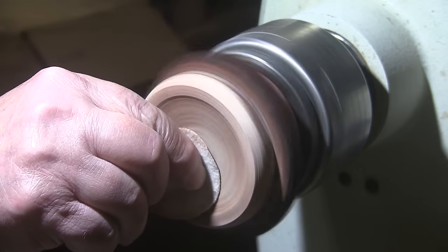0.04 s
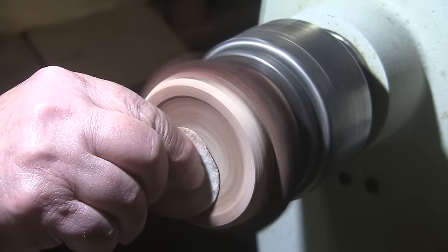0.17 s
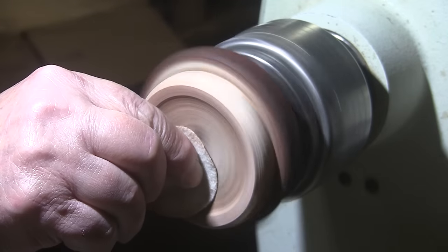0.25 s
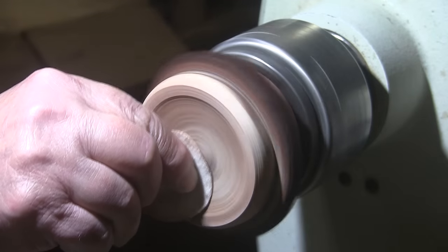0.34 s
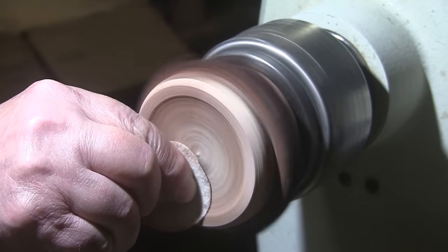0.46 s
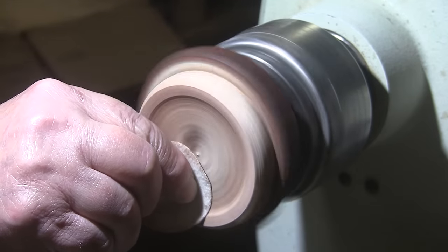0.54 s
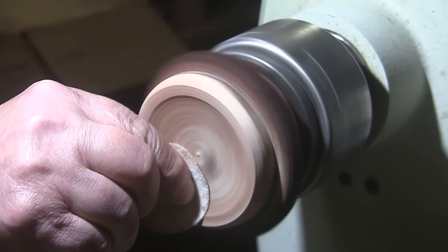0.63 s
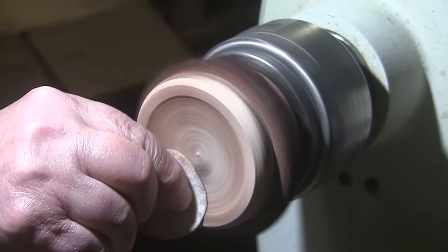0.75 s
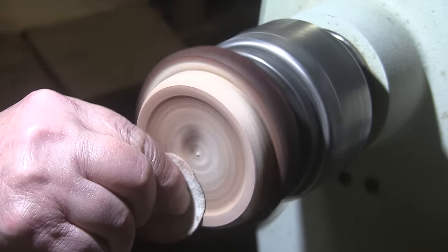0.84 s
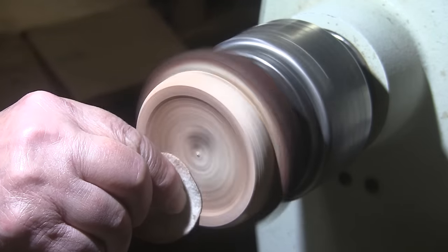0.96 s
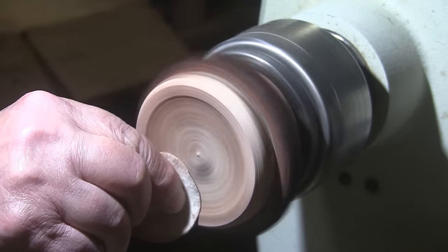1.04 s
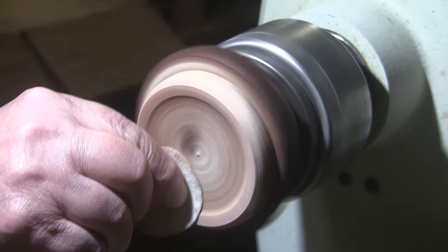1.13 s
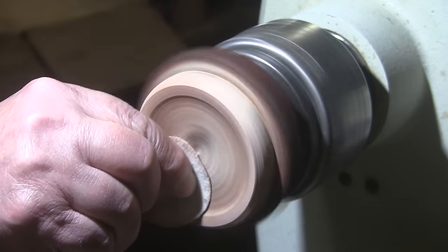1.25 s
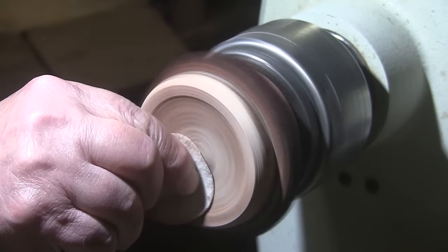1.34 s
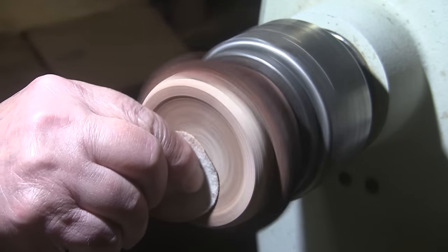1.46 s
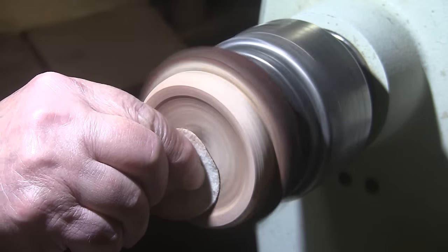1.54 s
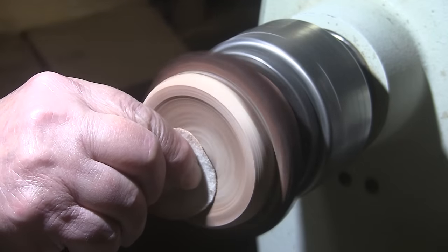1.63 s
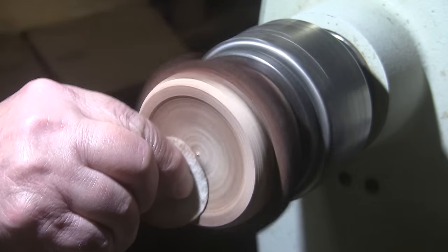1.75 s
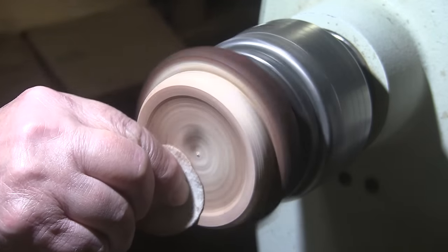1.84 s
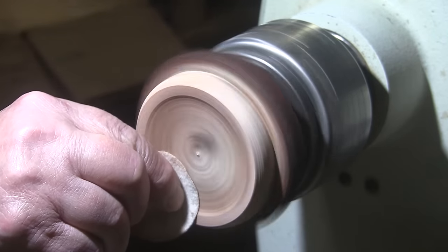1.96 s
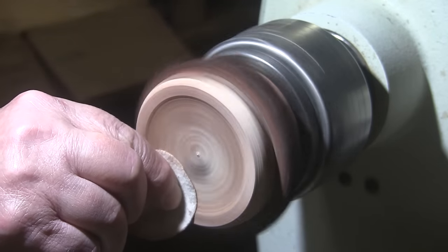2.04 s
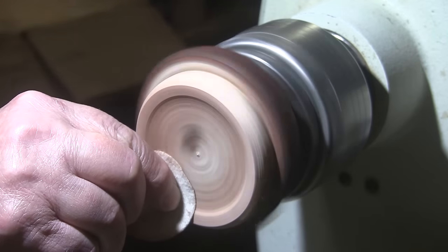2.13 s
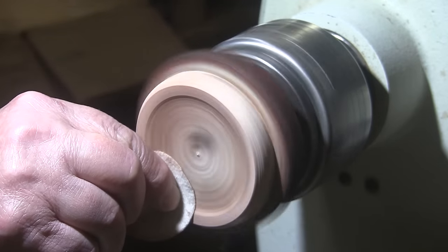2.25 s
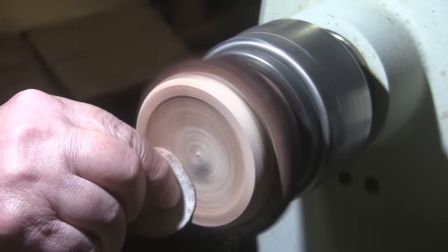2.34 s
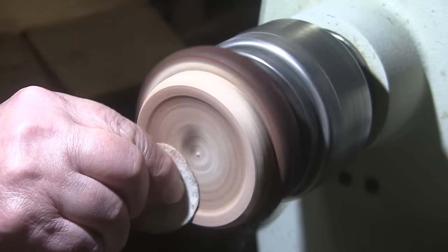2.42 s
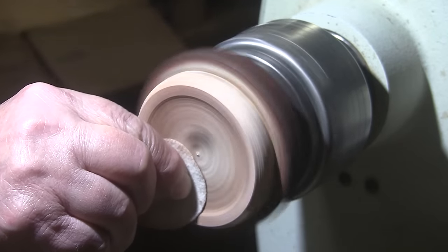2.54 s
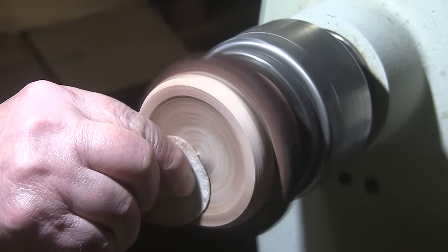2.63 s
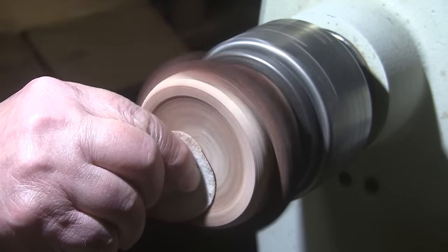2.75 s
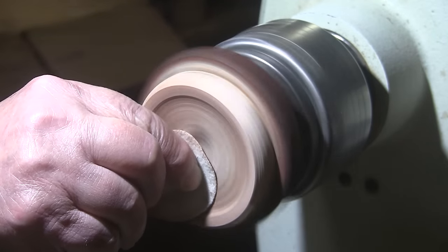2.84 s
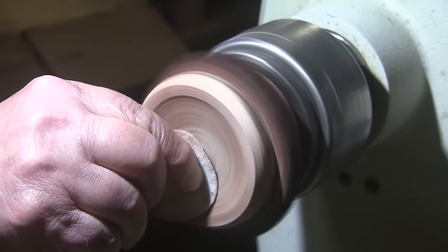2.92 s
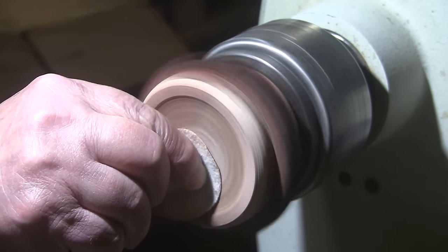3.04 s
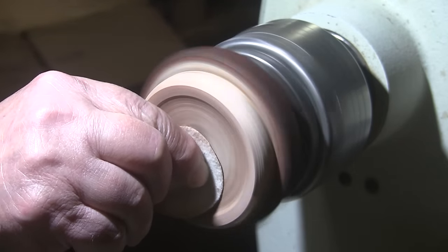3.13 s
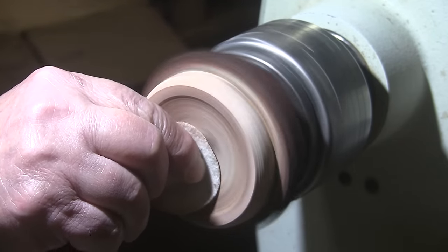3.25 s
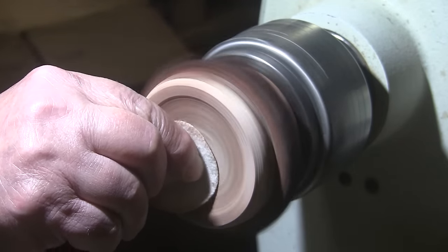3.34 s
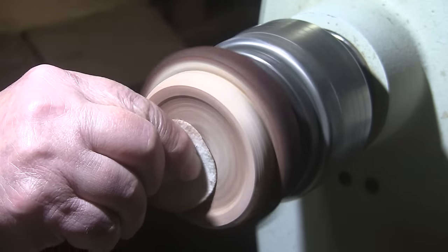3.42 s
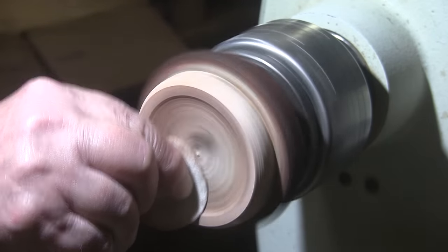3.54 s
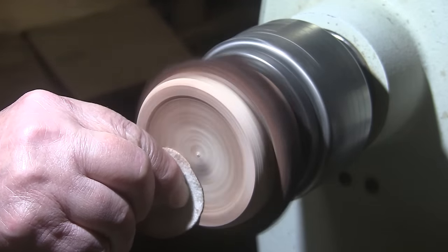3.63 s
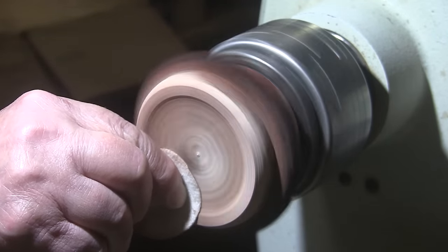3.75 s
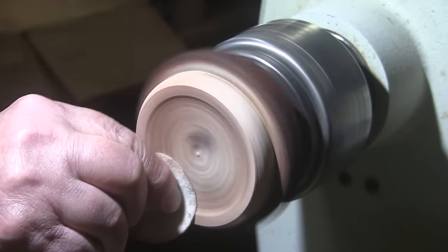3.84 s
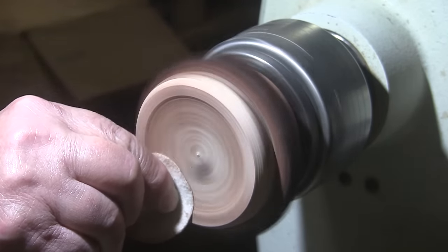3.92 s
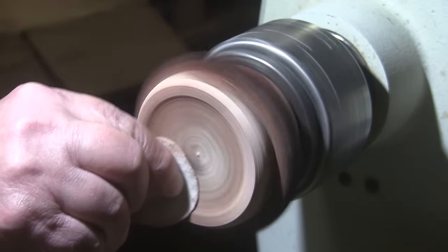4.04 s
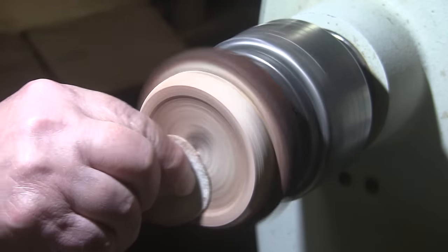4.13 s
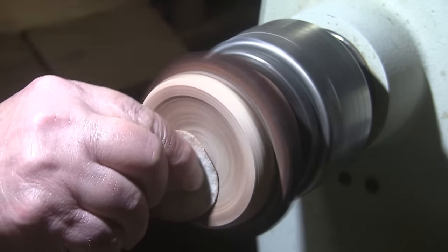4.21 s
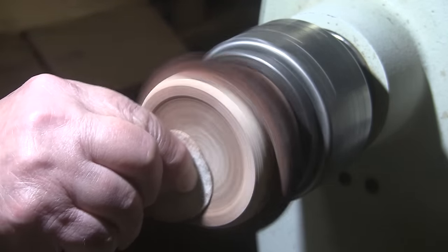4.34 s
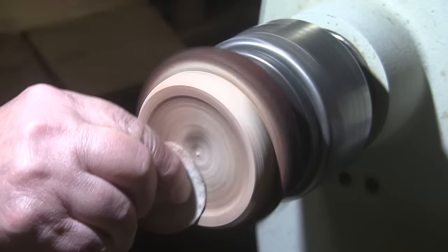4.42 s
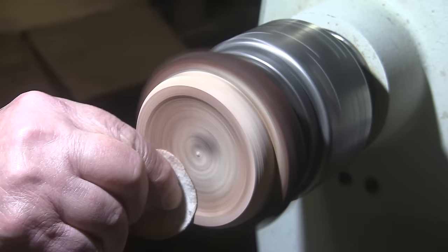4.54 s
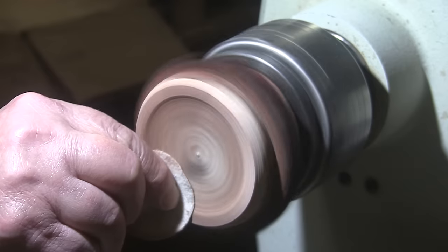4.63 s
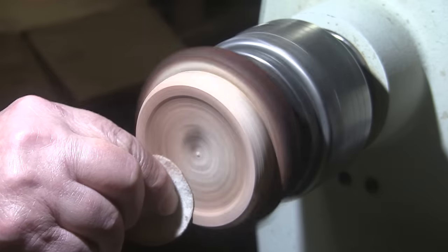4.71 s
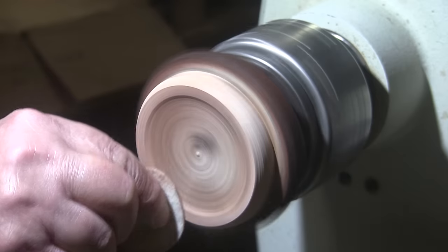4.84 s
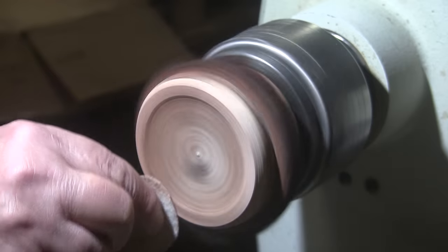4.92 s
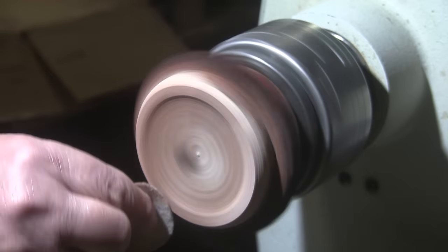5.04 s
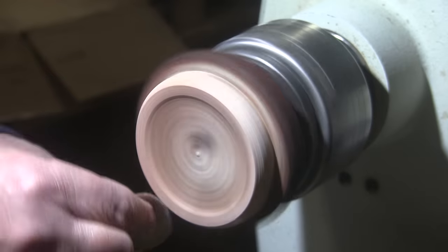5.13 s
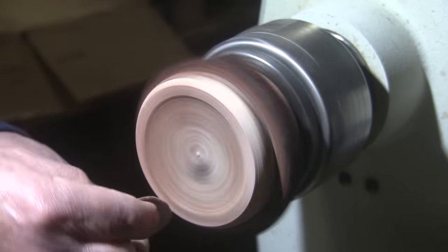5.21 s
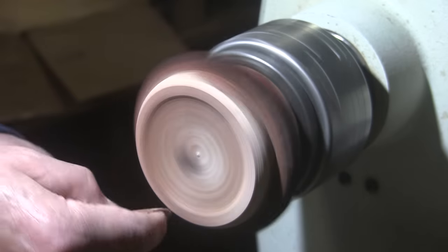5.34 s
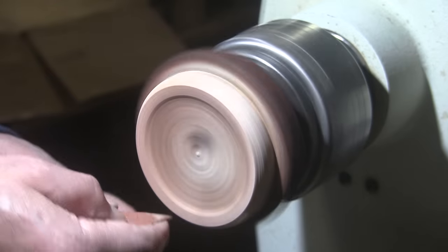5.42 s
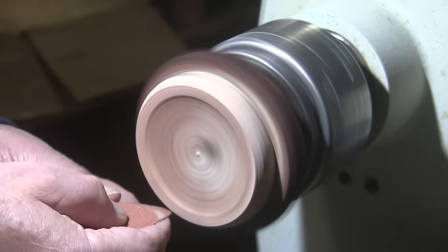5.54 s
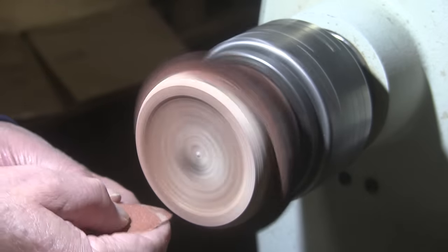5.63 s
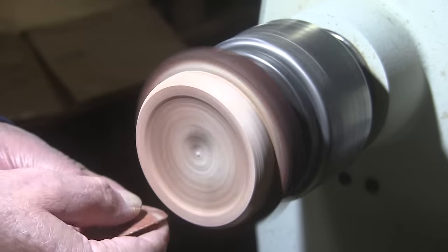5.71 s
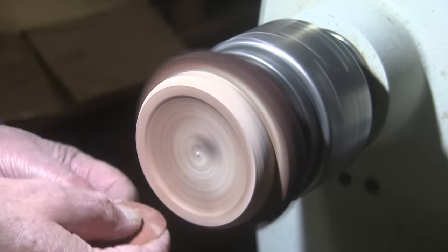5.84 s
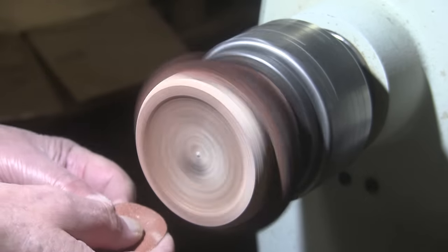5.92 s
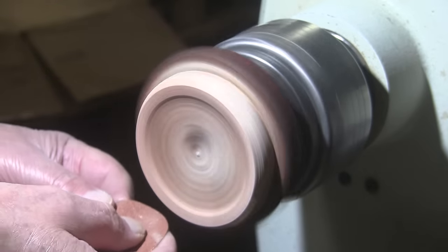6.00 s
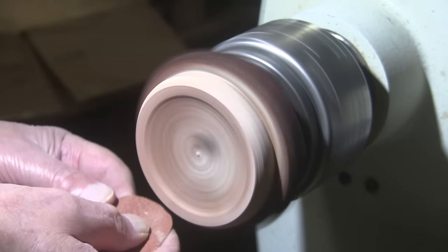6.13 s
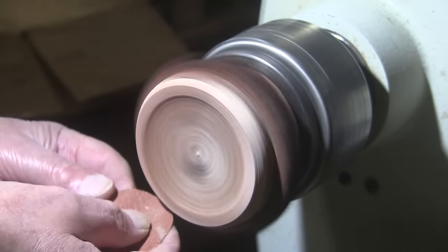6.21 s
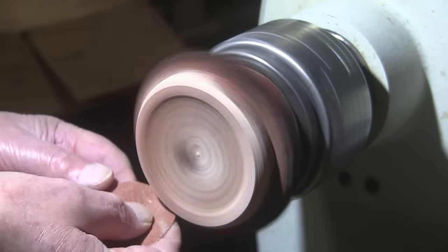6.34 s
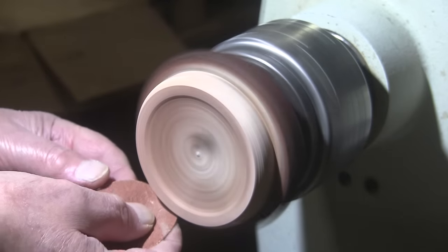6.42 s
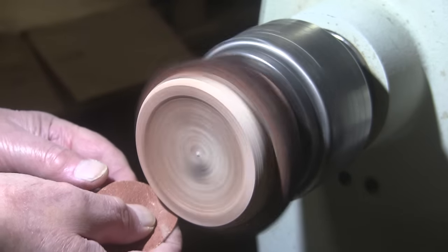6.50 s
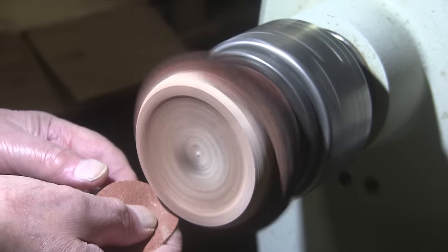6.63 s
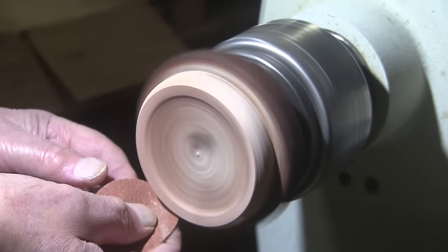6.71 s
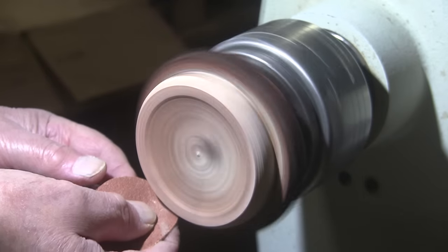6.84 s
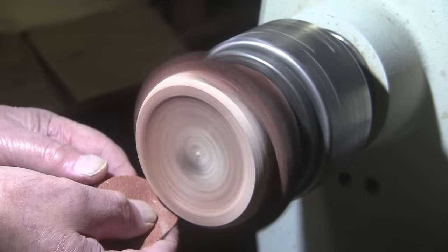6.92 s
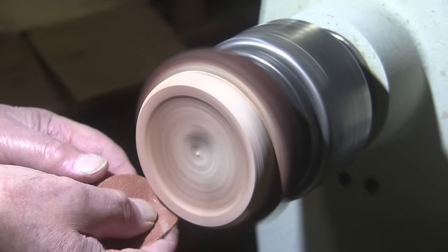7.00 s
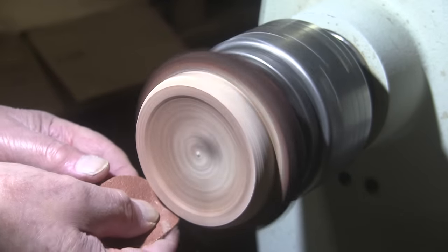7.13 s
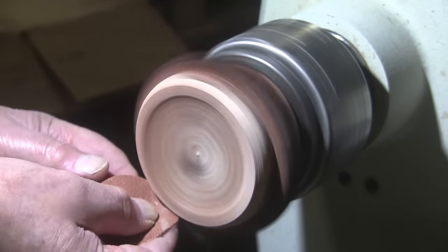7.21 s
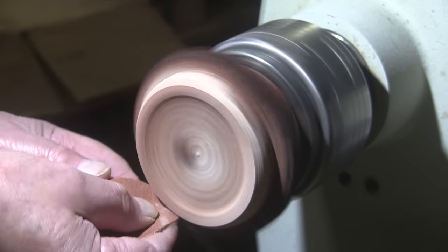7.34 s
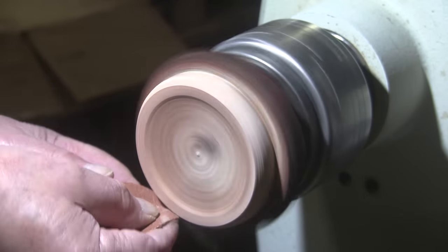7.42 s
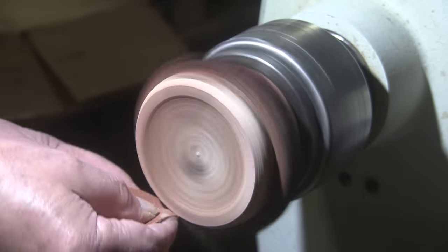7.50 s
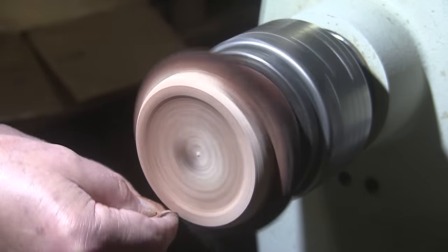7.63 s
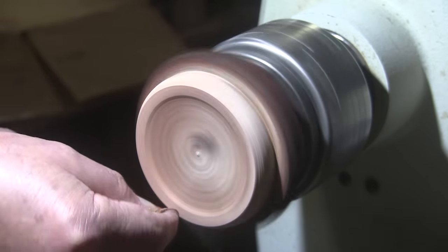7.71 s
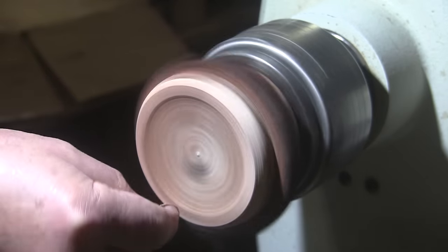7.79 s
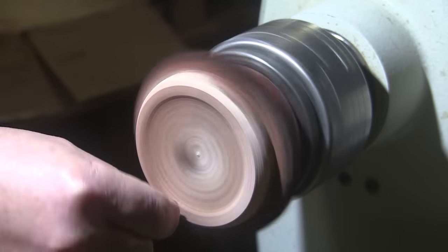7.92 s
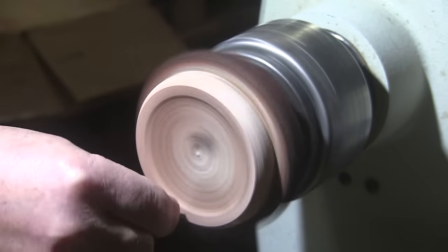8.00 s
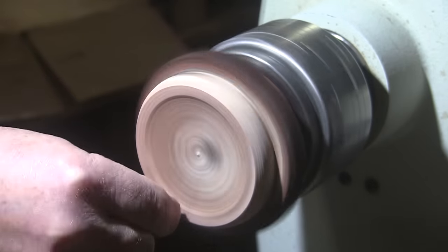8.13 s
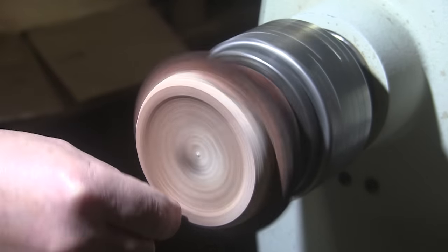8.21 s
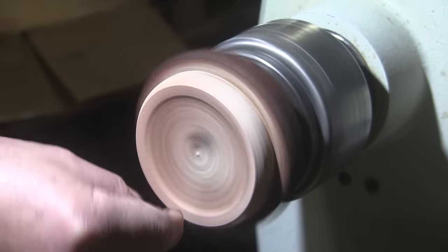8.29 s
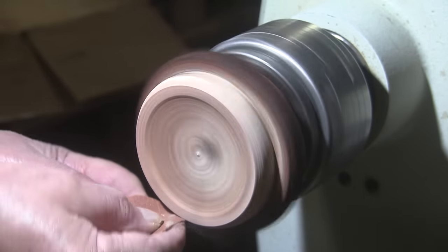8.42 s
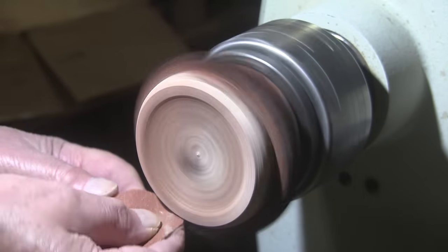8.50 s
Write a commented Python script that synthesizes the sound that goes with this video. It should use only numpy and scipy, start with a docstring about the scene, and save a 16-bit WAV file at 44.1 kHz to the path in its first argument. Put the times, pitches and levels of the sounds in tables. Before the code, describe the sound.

Loud gritty sandpaper hiss sweeps out and back four times on a spinning wooden bowl, lifts off to bare lathe drone, then rasps on the rim.

```python
"""At a workshop lathe, a hand holds an abrasive disc against a small spinning wooden bowl.
The disc sweeps out and back across the face four times, then lifts away and later rides on the rim.
Grit scratches (noise and clicks) ring the wood; further out is louder, and rough grain returns every turn.
Stray fibres snag the disc as short bursts. Underneath, noise makes the frame drone and the drive tick,
wavering sines make the motor hum, and a cluster of steady tones makes the speed controller whine."""
import sys
import numpy as np
from scipy import signal
from scipy.fft import irfft
from scipy.io import wavfile
from scipy.ndimage import uniform_filter1d

SR = 44100
rng = np.random.default_rng(int(sys.argv[2]) if len(sys.argv) > 2 else 0)


def put_to_file(sound):
    """Save the sound as 16-bit audio at rate SR, in the file named by the first command-line argument."""
    columns = np.atleast_2d(sound).T  # one column per channel
    safe = np.clip(columns, -1, 1)
    whole_steps = np.round(safe * 32767)
    wavfile.write(sys.argv[1], SR, whole_steps.astype(np.int16))


N = 377562
TIME = np.arange(N) / SR  # seconds

# turning rates of the bowl and the drive, and the motor supply frequency
SPINDLE_HZ, DRIVE_HZ, SUPPLY_HZ = 6.93, 23.95, 41.4
# top of the band that is kept
EDGE_HZ = 15850
# level of the frame's drone
FRAME_DB = -37
# pitch of the motor hum, and its level before the left-right balance
HUM_HZ, HUM_DB = 75.7, -52.5
# the hand nearly lets go once
SLACK_S, SLACK_LENGTH_S, SLACK_DB = 3.44, 0.14, -9.5
# the hand lifts the disc off the face: the drop after one length, growing with the square of time
LIFT_S, LIFT_LENGTH_S, LIFT_DB = 4.954, 0.11, -22.5

# broad colours of the lathe frame and of a drive tick: [pitch_hz, relative_level_db]
FRAME_COLOUR = [(22, -19), (48, -6.5), (100, 1.5), (150, 0.5), (300, -4), (900, -7.5), (1600, -3.5),
                (3000, -11.5), (8000, -16.5), (12500, -21), (15700, -9.5)]
TICK_COLOUR = [(500, -13), (1500, 2.5), (3500, 2.5), (7000, -2), (11000, -5), (15000, -9.5)]
# broad colours of the two places where the disc rubs: [pitch_hz, relative_level_db]
FACE_COLOUR = [(60, -48), (300, -31.5), (1100, -16.5), (1800, -12), (3000, -9), (5000, -1.5), (8000, 0),
               (10000, -1.45), (13000, -2.5), (15600, -10)]
RIM_COLOUR = [(60, -42), (300, -22), (1100, -13), (1800, -14.5), (3000, -9.5), (5000, 1.8), (8000, 1.5),
              (10000, 2), (13000, -0.5), (15600, -6)]
# broad colours of a catch, its snap and its dragging scrape: [pitch_hz, relative_level_db]
SNAP_COLOUR = [(80, -42), (400, -15), (1100, -12), (2050, 1.5), (2600, -2.5), (3400, 2.5), (5500, -5),
               (15000, -22)]
DRAG_COLOUR = [(400, -29), (1100, -17), (1650, -7), (2050, 1), (2400, -5), (3300, -6), (6000, -13),
               (15000, -26)]
# resonances of the frame and of the wood rubbed at the face and rim: [pitch_hz, width_hz, lift_db]
FRAME_MODES = [(222, 4, 8), (242, 15, 8.5), (376.4, 77, 14.3), (415, 14, 6.4), (515.6, 49, 11.5),
               (662, 46, 10.9), (787, 110, 9.9), (879, 49, 10.5), (974, 63, 10.5), (1123, 19, 10.4),
               (1320, 50, 9), (2960, 330, 8.1), (3870, 190, 4)]
FACE_MODES = [(2070, 150, 4.5), (2721, 420, 7.9), (3393, 220, 11.4), (3650, 150, 5.2), (4010, 230, 9.9),
              (4574, 230, 6.1), (5420, 165, 6.6), (6230, 200, 4), (6800, 71, 6.3), (7510, 140, 5.1),
              (11560, 250, 2.5)]
RIM_MODES = [(1970, 260, 8.3), (2780, 520, 8.3), (3296, 330, 10.2), (4000, 610, 6.9), (6440, 320, 4.7),
             (6880, 105, 8.3), (7800, 190, 2.7), (8750, 270, 2.8), (11260, 235, 4)]
# the disc's free edge sings while the wood's lower ring fades: [pitch_hz, width_hz, lift_at_share_1_db]
DISC_MODES = [(3300, 1500, -3.5), (7600, 420, 6), (8870, 390, 5)]
# the bowl's wall rings more when rubbed near the edge: [pitch_hz, width_hz, lift_at_amount_1_db]
WALL_MODES = [(2690, 400, 8.5), (4000, 200, 1.5)]
# moments when the disc's edge sings: [middle_s, length_s, share_of_lift]
SINGS = [(0.965, 0.2, 1.2), (7.697, .35, 0.67), (8.552, 0.24, 1.85)]
# sweeps from the centre of the face to its edge and back:
# [sets_out_s, at_edge_s, turns_back_s, at_centre_s, extra_force_at_edge_db]
SWEEPS = [(0.376, .93, 1.05, 1.277, 7), (1.68, 2.01, 2.19, 2.85, 7.5), (3.413, 3.73, 3.99, 4.09, 7.5),
          (4.355, 4.55, 4.64, 5.56, 8)]
# how firmly the hand presses at the centre of the face: [time_s, force_db]
FIRMNESS = [(0, -21.5), (1.4, -24.5), (2.7, -24.5), (3.3, -27), (4.2, -23.5)]
# where the disc bites deepest and where it hisses brightest: [place (0 centre, 1 edge), width, lift_db]
BITE_ZONE = (0.43, 0.8, 6)
SHARP_ZONE = (0.75, 0.46, 2.85)
# the disc on the rim, before its bounce: [time_s, force_db, low_band_lift_db, treble_lift_db]
RIM_HOLD = [(6.326, -33.5, 2, -5.5), (6.5, -20.5, 4.5, -6), (6.82, -17, -2, -6), (6.88, -21.5, -2.5, 2.5),
            (7.12, -19.5, -0.5, 1), (7.56, -24.5, -1.5, -0.5), (7.9, -29, 3, 4.5), (8.33, -30.5, 3.5, 2),
            (8.5, -20.5, -1, 1)]
# stray fibres catch the disc: [start_s, strength_db], before the snap and drag levels
CATCHES = [(.548, -20), (.697, -5), (.828, -13), (1.122, -12), (1.844, -3.5), (2.41, -3.5), (2.435, -7),
           (2.564, -4), (3.717, -10), (4.417, -11), (4.437, -8.5), (4.491, -5), (4.708, -9), (4.859, -13.5),
           (6.385, -9.5), (6.408, -5), (6.591, -9.5), (6.79, -7)]
# the hardest ticks of the drive: [start_s, level_db]
HARD_TICKS = [(5.269, -41), (5.73, -40), (5.894, -33), (6.314, -33)]
# lulls and swells of the hum: [middle_s, length_s, change_db, pitch_sag_hz]
HUM_CHANGES = [(1.25, 0.69, -16, 0), (2.245, 0.37, -15, 0), (7.05, .6, -7, 0), (7.63, 0.39, 8, 4)]
# the microphone pair, likeness of its two channels: [pitch_hz, likeness (0 to 1)]
LIKENESS = [(60, 0.99), (150, 0.97), (380, 0.94), (950, 0.61), (2380, 0.63), (5980, 0.54), (15000, 0.12)]
# the microphone pair, left against right: [pitch_hz, left_minus_right_db]
BALANCE = [(60, 0), (92, -4), (140, -1.5), (210, -5), (330, -1.5), (500, -4.0), (770, -1.5), (1170, -5),
           (1790, 0), (2740, -1.0), (4190, -1.5), (6410, 0.5), (9810, -7.5), (15000, -7)]
# the microphone pair, how far left leads right: [pitch_hz, lead_radians]
LEAD = [(300, -0.86), (3000, 0.33), (7000, -1), (10000, 0.8), (11500, 2.5), (15000, 2.8)]


def gain_of(db):
    """Turns decibels into amplitude."""
    return np.exp(np.asarray(db) * (np.log(10) / 20))


def evened(x):
    """Scales to rms 1."""
    return x / np.sqrt(np.mean(x ** 2) + 1e-20)


def read(points, hz):
    """Reads a table between its points, along a log-pitch axis."""
    f, value = np.transpose(points)
    return np.interp(np.log(hz + 1), np.log(f + 1), value)


def bell(x, middle, width):
    """A smooth hump of height 1, with its width taken at half height."""
    return np.exp2(-(2 * (x - middle) / width) ** 2)


def wander(rate_hz):
    """Smooth random drift of rms 1, mostly slower than the given rate."""
    hz = np.fft.rfftfreq(2 ** 19, 1 / SR)
    real, imaginary = rng.standard_normal((2, 4096))
    spectrum = (real + 1j * imaginary) * np.exp(-(hz[:4096] / rate_hz) ** 2)
    return evened(irfft(spectrum, 2 ** 19)[:N])


def colour(broad, modes, hz):
    """A broad spectrum with resonances standing on it, in dB."""
    peaks = sum(db / (1 + (2 * (hz - f) / width) ** 2) for f, width, db in modes)
    return read(broad, hz) + peaks


def radiate(drive, broad, modes=(), band=(0, SR), tilt=None, size=1024):
    """Two drives ring a body and reach the microphone pair; unit white drive gives unit level in the band."""
    overlap = size * 3 // 4
    hz, t, (a, b) = signal.stft(drive, SR, nperseg=size, noverlap=overlap)
    body = gain_of(colour(broad, modes, hz))
    in_band = (hz >= band[0]) * (hz <= band[1])
    body /= np.sqrt(np.mean(body ** 2 * in_band))

    # the right channel shares part of the left one's sound, and comes later where left leads
    same = np.clip(read(LIKENESS, hz), 0, .99)[:, None]
    right = same * a + np.sqrt(1 - same ** 2) * b
    right = right * np.exp(-1j * read(LEAD, hz))[:, None]

    side = gain_of(read(BALANCE, hz) / 2)[:, None]
    balance_size = np.sqrt((side ** 2 + side ** -2) / 2)
    pair = np.array([a * side, right / side]) * body[:, None] / balance_size
    if tilt:
        pair = pair * gain_of(tilt(hz, t))
    return signal.istft(pair, SR, nperseg=size, noverlap=overlap)[1][:, :N]


def grit(per_s, spread_db, share):
    """Countless tiny scratches merge into a hiss; the larger grains stand out as clicks."""
    sizes = np.minimum(rng.exponential(1, N), 2.8)
    clicks = (rng.random(N) < per_s / SR) * gain_of(spread_db * sizes)
    clicks = evened(clicks * rng.choice([-1, 1], (2, N)))
    hiss = rng.standard_normal((2, N))
    return np.sqrt(1 - share) * hiss + np.sqrt(share) * clicks


def bursts(events, decay_s):
    """Each event jumps to its level and dies away."""
    s, db = np.transpose(events)
    kicks = np.bincount(np.round(s * SR).astype(int), gain_of(db), N)
    return signal.lfilter([1], [1, -np.exp(-1 / (decay_s * SR))], kicks + 1e-12)


def echoes(drive, t60_s=0.062):
    """Lathe bed, hand and bench throw back a short, faint tail."""
    age = np.arange(SR // 5) / SR
    taps = rng.choice([-1., 1.], len(age)) * (rng.random(len(age)) < .05) * (age > .003)
    taps *= gain_of(-60 * age / t60_s)
    taps *= gain_of(-13) / np.linalg.norm(taps)
    taps[0] = 1  # the direct sound
    return signal.oaconvolve(drive, taps[None] / np.linalg.norm(taps))[:, :N]


def frame(repeat_share=0.23):
    """Bearings and belt shake the frame; part of the shaking repeats with every spindle turn."""
    turn = rng.standard_normal((2, round(SR / SPINDLE_HZ)))
    repeating = turn[:, np.arange(N) % turn.shape[1]]
    fresh = rng.standard_normal((2, N))
    drive = np.sqrt(repeat_share) * repeating + np.sqrt(1 - repeat_share) * fresh
    return gain_of(FRAME_DB) * radiate(drive, FRAME_COLOUR, FRAME_MODES, size=4096)


def tone(hz, waver_hz):
    """A slightly wavering sine of rms 1."""
    turns = np.cumsum(hz + waver_hz * wander(7.1)) / SR
    return np.sqrt(2) * np.sin(2 * np.pi * (turns + rng.random()))


def hum(beat_db=-58, sing_db=-52.5):
    """The motor hum beats against a multiple of the spindle rate; a higher line sings in the housing."""
    changes = [np.outer(change, bell(TIME, s, length)) for s, length, *change in HUM_CHANGES]
    change_db, sag_hz = sum(changes)
    motor = gain_of(HUM_DB + change_db) * tone(HUM_HZ - sag_hz, 0.49)
    spindle = gain_of(beat_db) * tone(83.2, 0.67)
    housing = gain_of(sing_db) * tone(372, 2.25)
    return (motor + spindle + housing) * gain_of([[-1.8], [1.5]])  # left, right


def whine(level_db=-52, centre_hz=15130, width_hz=450, count=20):
    """The speed controller's switching tone, with sidebands spaced by the motor supply frequency."""
    offsets = SUPPLY_HZ * np.arange(-count, count + 1)
    uneven = gain_of(3 * rng.standard_normal((2, len(offsets))))
    heights = np.exp(-(offsets / width_hz) ** 2 / 2) * uneven
    phases = np.exp(2j * np.pi * rng.random(heights.shape))
    lines = np.zeros((2, N // 2 + 1), complex)
    lines[:, np.round((centre_hz + offsets) * N / SR).astype(int)] = heights * phases
    return gain_of(level_db) * evened(irfft(lines, N))


def ticks(at_turn=.2, level_db=-38.5, spread_db=4):
    """The drive ticks once a revolution at varying strength, with a few harder ticks added."""
    s = np.arange(at_turn, TIME[-1] * DRIVE_HZ) / DRIVE_HZ
    db = level_db + spread_db * rng.uniform(-1, 1, len(s))
    force = bursts(np.transpose([s, db]), decay_s=.007) + bursts(HARD_TICKS, decay_s=.011)
    return radiate(force * grit(per_s=1500, spread_db=3, share=.3), TICK_COLOUR, FRAME_MODES)


def surface(count=22):
    """Roughness round the bowl repeats each turn and changes slowly as the hand shifts."""
    t = TIME[::32]
    knots = np.arange(0, t[-1] + 1, .6)
    heights = rng.standard_normal((count, 2, len(knots)))
    ripple = np.zeros(len(t))
    for k, (a, b) in enumerate(heights, 3):  # k ripples in each turn
        wave = np.interp(t, knots, a + 1j * b) * np.exp(2j * np.pi * k * SPINDLE_HZ * t)
        ripple += wave.real / k ** 0.71
    return evened(np.interp(TIME, t, ripple))


def end_grain(t, at_turn, focus, opposite):
    """End grain passes under the disc twice a turn, once strongly; zero mean."""
    angle = np.cos(2 * np.pi * (SPINDLE_HZ * t - at_turn))
    bump = np.exp(focus * (angle - 1)) + opposite * np.exp(-focus * (angle + 1))
    return bump - bump.mean()


def slips(per_s, decay_s):
    """Small stick-slip jerks, each sudden and then dying away; zero mean, rms 1."""
    jerks = (rng.random(N) < per_s / SR) * rng.uniform(0.047, 1, N)
    fading = signal.lfilter([1], [1, -np.exp(-1 / (decay_s * SR))], jerks)
    x = np.sqrt(fading + .05)
    return evened(x - x.mean())


def wobble(at_turn):
    """The bowl runs slightly out of true and leans into the disc once a turn."""
    return np.cos(2 * np.pi * (SPINDLE_HZ * TIME - at_turn))


def sanding(force_db, bite_db, sharp_db, wall, broad, modes, throb_db, rasp_db, ripple_db,
            patchy_db, slip_db, at_turn, opposite):
    """Grit scrapes the wood; end grain adds a lower rasp, and the colour shifts as the contact wanders."""
    passing = end_grain(TIME, at_turn, focus=3.0, opposite=opposite)
    singing = sum(share * bell(TIME, s, length) for s, length, share in SINGS)

    def tilt(hz, t):
        """Bite lifts the low band, sharpness the treble; patches of the spectrum come and go."""
        flat = [(0, 0)]
        lifts = [(read([(2400, 1), (3300, 0.024)], hz), bite_db + rasp_db * passing),
                 (read([(5500, 0.068), (9500, 0.99)], hz), sharp_db),
                 (colour(flat, DISC_MODES, hz), singing),
                 (colour(flat, WALL_MODES, hz), wall)]
        patches = rng.standard_normal((len(hz), len(t)))
        patches = uniform_filter1d(patches, size=7, axis=0)  # blur over pitch
        patches = evened(uniform_filter1d(patches, size=16, axis=1))  # blur over time
        lift_db = sum(np.outer(shape, np.interp(t, TIME, amount)) for shape, amount in lifts)
        return lift_db + patchy_db * patches

    force_db = force_db + throb_db * passing + ripple_db * surface()
    force_db = force_db + slip_db * slips(per_s=60, decay_s=.011)
    drive = grit(per_s=2500, spread_db=2.0, share=0.16) * gain_of(force_db)
    return radiate(echoes(drive), broad, modes, band=(3000, 7000), tilt=tilt)


def face(centre_bite_db=-3, centre_sharp_db=-3.0, edge_sharp_db=2.5, wobble_db=0.6, tremor_db=0.82):
    """The further out the disc sits, the faster the wood runs under it: louder and brighter."""
    paths = [np.interp(TIME, row[:4], [0, 1, 1, 0]) for row in SWEEPS]
    radius = sum(paths)  # 0 centre, 1 edge

    force_db = np.interp(TIME, *np.transpose(FIRMNESS))
    force_db += sum(path * row[-1] for path, row in zip(paths, SWEEPS))
    force_db += SLACK_DB * bell(TIME, SLACK_S, SLACK_LENGTH_S)
    force_db += wobble_db * wobble(at_turn=1.0)
    force_db += LIFT_DB * np.clip((TIME - LIFT_S) / LIFT_LENGTH_S, 0, 2) ** 2

    bite_db = centre_bite_db + BITE_ZONE[2] * bell(radius, *BITE_ZONE[:2])
    sharp_db = centre_sharp_db + edge_sharp_db * radius
    sharp_db += SHARP_ZONE[2] * bell(radius, *SHARP_ZONE[:2])
    sharp_db += tremor_db * wander(26)  # the treble flickers
    wall = radius ** 2 - .4
    return sanding(force_db, bite_db, sharp_db, wall, FACE_COLOUR, FACE_MODES,
                   throb_db=2, rasp_db=1.8, ripple_db=0.72, patchy_db=2.0, slip_db=0.99,
                   at_turn=0.75, opposite=.1)


def catches(events, snap_db, snap_s, drag_db, drag_s, knock_db):
    """Rough fibres snag the disc: a broad snap, and a short scrape that rings the wood."""
    def snag(db, decay_s):
        """Gritty bursts at the given level, with their echoes."""
        scratches = grit(per_s=1600, spread_db=4.5, share=0.26)
        return echoes(gain_of(db) * bursts(events, decay_s) * scratches)

    snap = radiate(snag(snap_db, snap_s), SNAP_COLOUR, size=256)
    drag = radiate(snag(drag_db, drag_s), DRAG_COLOUR, [(2010, 200, knock_db)])
    return snap + drag


def rim(bounce_db=4, settle_s=0.86, touch_s=.004):
    """The disc bounces on the rim at first, then settles and rides more lightly."""
    s, *columns = np.transpose(RIM_HOLD)
    force_db, bite_db, sharp_db = (np.interp(TIME, s, column) for column in columns)
    age = TIME - s[0]
    force_db += bounce_db * np.exp(-np.maximum(age, 0) / settle_s) * wobble(at_turn=0.18)
    force_db += 20 * np.log10(np.clip(1 + age / touch_s, 1e-5, 1))  # silent until the touch
    return sanding(force_db, bite_db, sharp_db, np.zeros(N), RIM_COLOUR, RIM_MODES,
                   throb_db=1.5, rasp_db=7, ripple_db=0.83, patchy_db=1.7, slip_db=1,
                   at_turn=0.73, opposite=0.17)


def rough_spot(first_s=7.25, at_turn=.638, light_db=-15, extra_db=7, worst_s=7.9, length_s=0.59):
    """One rough spot on the rim catches every turn, hardest while the disc rides lightly: start_s, strength_db."""
    turns = np.arange(np.floor(first_s * SPINDLE_HZ), np.floor(TIME[-1] * SPINDLE_HZ))
    s = (turns + at_turn) / SPINDLE_HZ
    return np.transpose([s, light_db + extra_db * bell(s, worst_s, length_s)])


def scene():
    """Sanding on the face, then on the rim, over the running lathe."""
    lathe = frame() + hum() + whine() + ticks()
    fibres = catches(CATCHES, snap_db=-10.5, snap_s=0.0046, drag_db=-16.5, drag_s=0.015, knock_db=-3)
    spot = catches(rough_spot(), snap_db=-6.5, snap_s=.0038, drag_db=-19.5, drag_s=.02, knock_db=11)
    return lathe + face() + fibres + rim() + spot


def record(dry, threshold_db=-17, recovery_db_per_s=22, squeeze=0.82):
    """Gain control turns everything down under hard sanding; high peaks are rounded; the top band is cut."""
    power = signal.lfilter([1 / 2000], [1, 1 / 2000 - 1], (dry ** 2).mean(0))
    # the level follows rises at once and falls back at the recovery rate
    fall_db = TIME * recovery_db_per_s
    held_db = np.maximum.accumulate(10 * np.log10(power + 1e-12) + fall_db) - fall_db
    over_db = np.maximum(held_db - threshold_db, 0)
    ducked = dry / gain_of(squeeze * uniform_filter1d(over_db, size=800))
    rounded = ducked / (1 + (ducked / .85) ** 6) ** (1 / 6)
    low_pass = signal.firwin(701, EDGE_HZ, window=("kaiser", 9), fs=SR)
    return signal.oaconvolve(rounded, low_pass[None], "same")


dry = scene()
out = record(dry)
put_to_file(out)
```